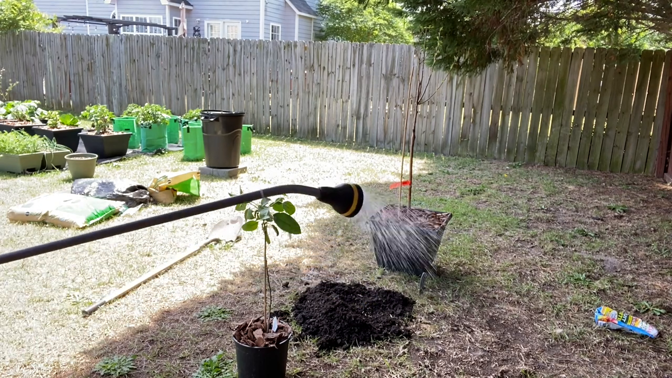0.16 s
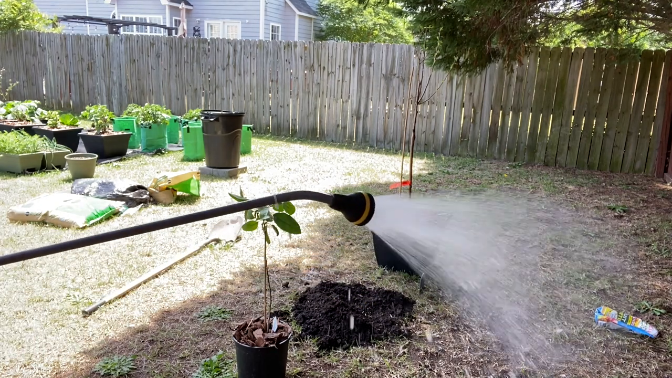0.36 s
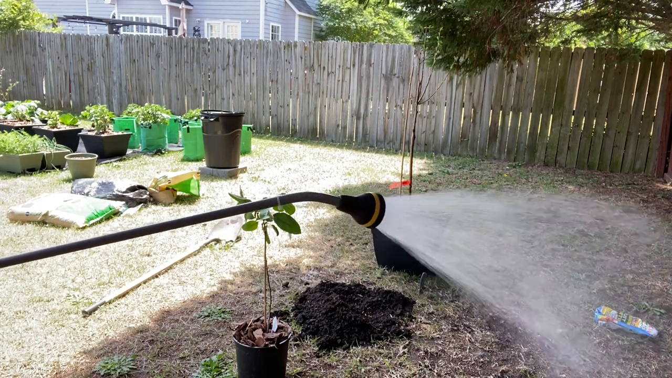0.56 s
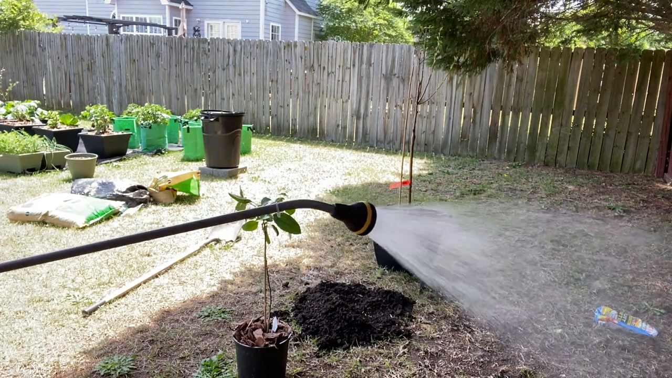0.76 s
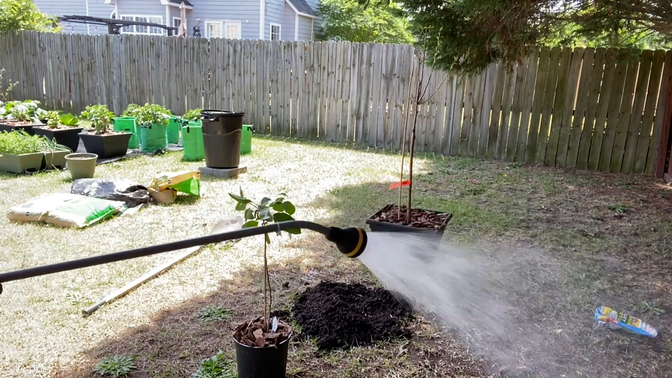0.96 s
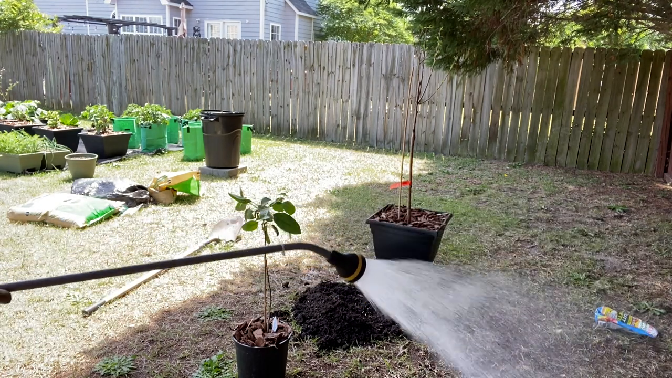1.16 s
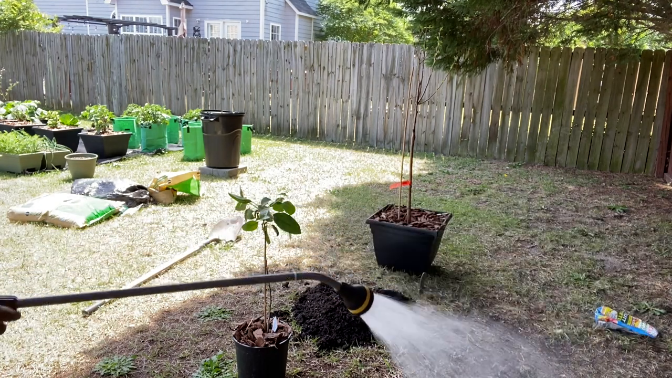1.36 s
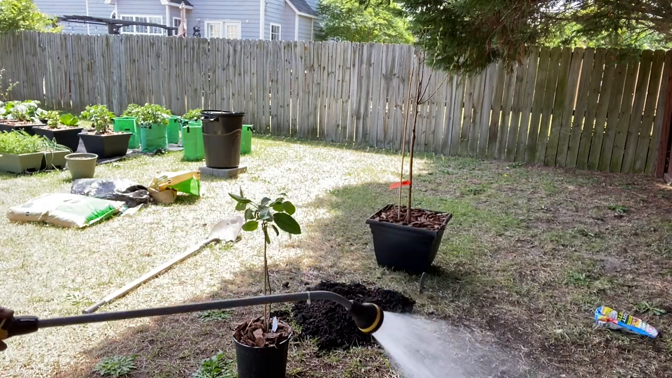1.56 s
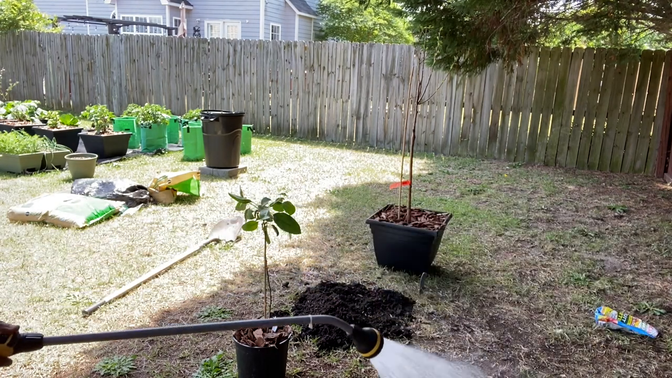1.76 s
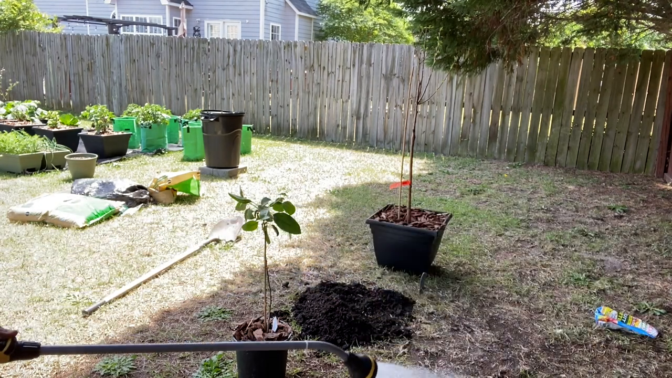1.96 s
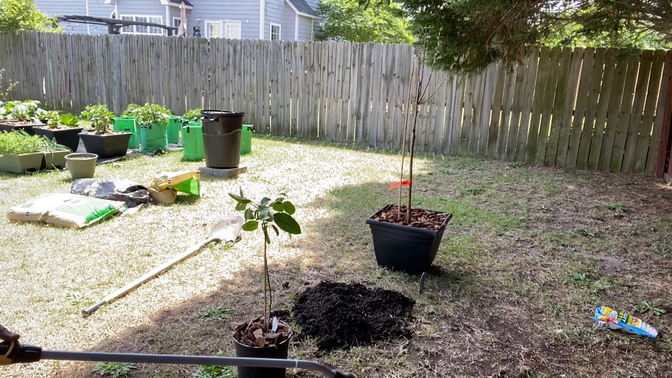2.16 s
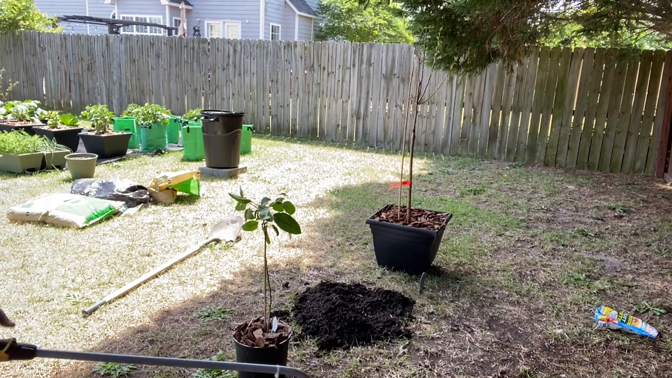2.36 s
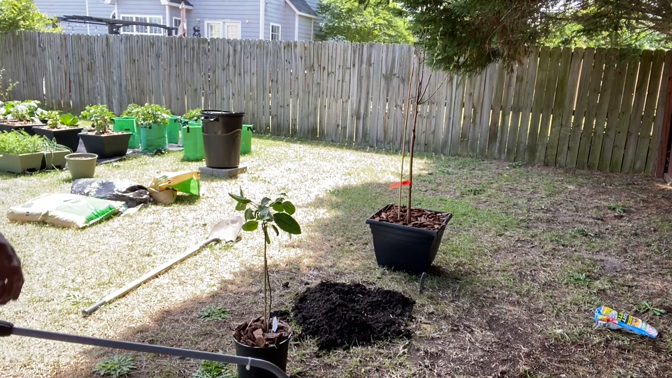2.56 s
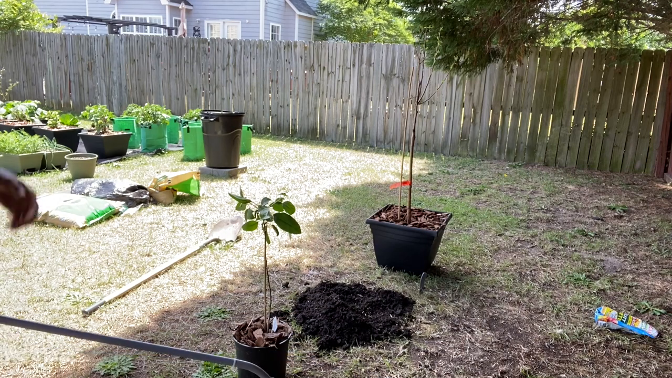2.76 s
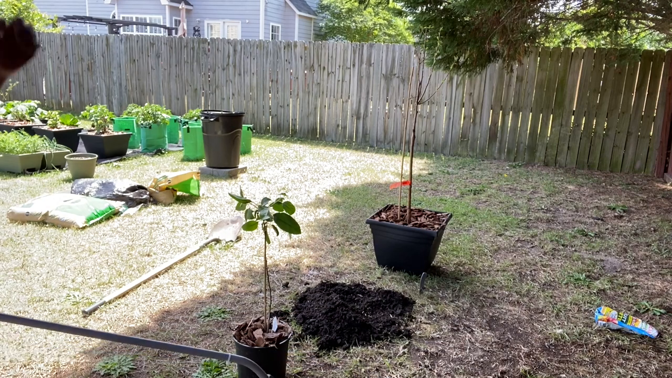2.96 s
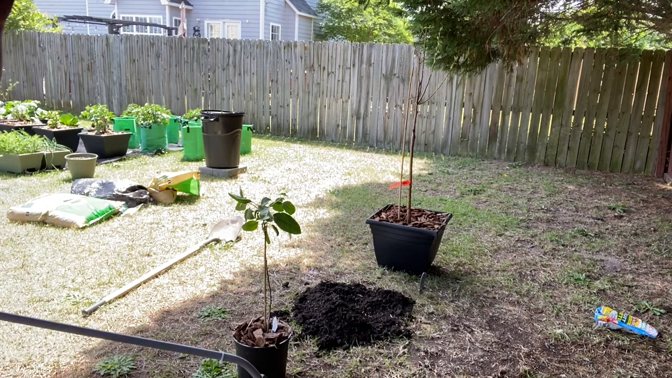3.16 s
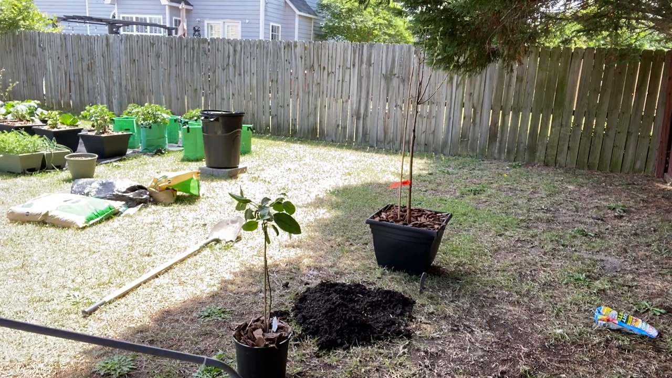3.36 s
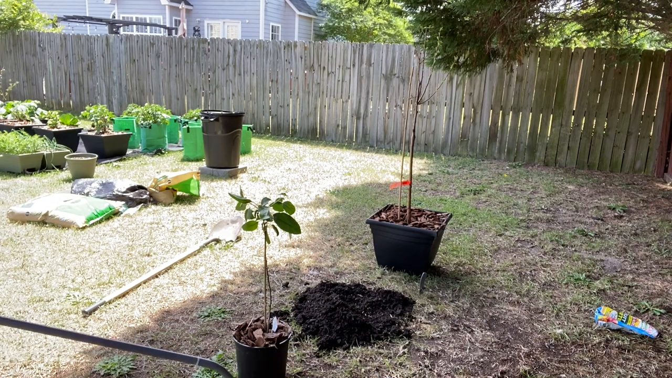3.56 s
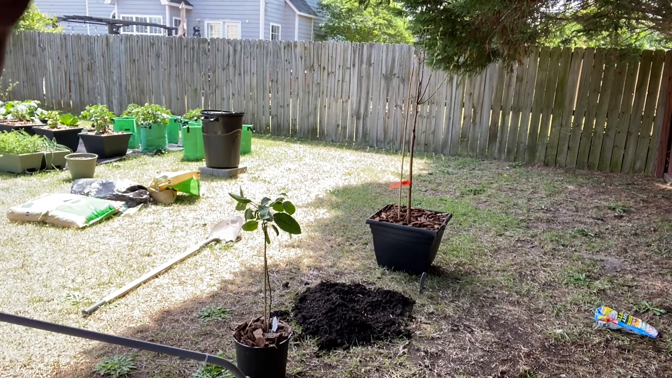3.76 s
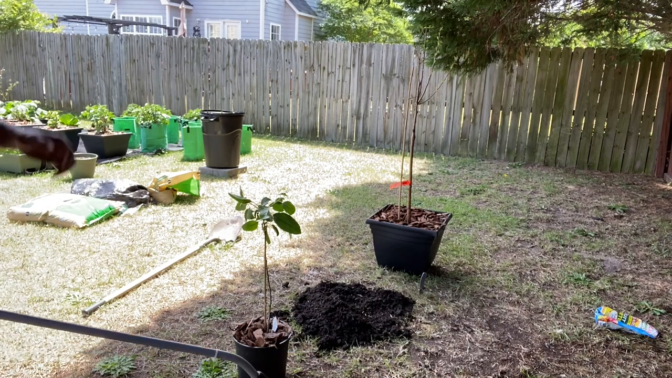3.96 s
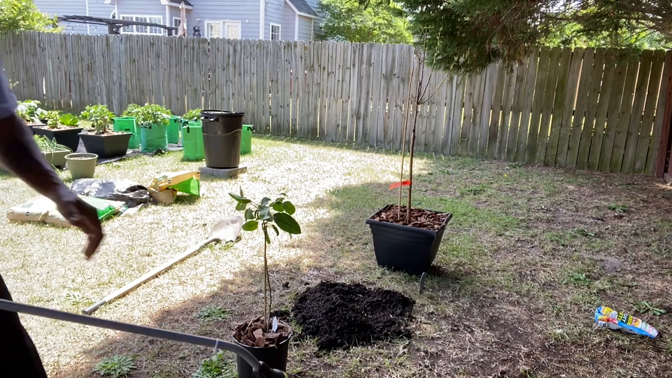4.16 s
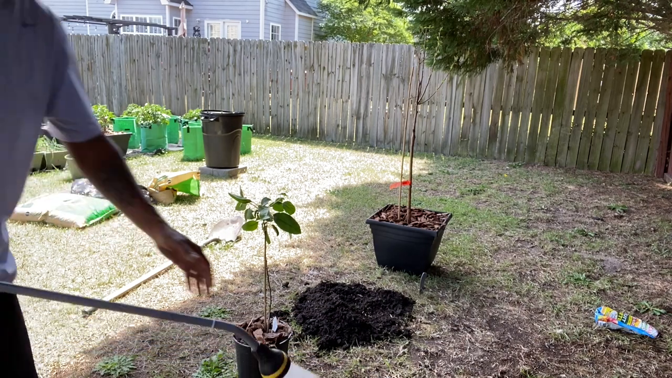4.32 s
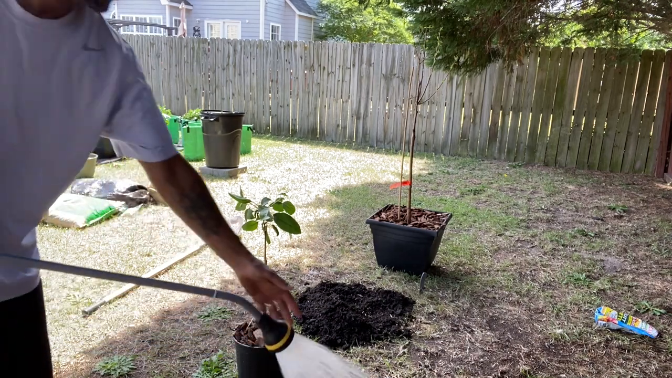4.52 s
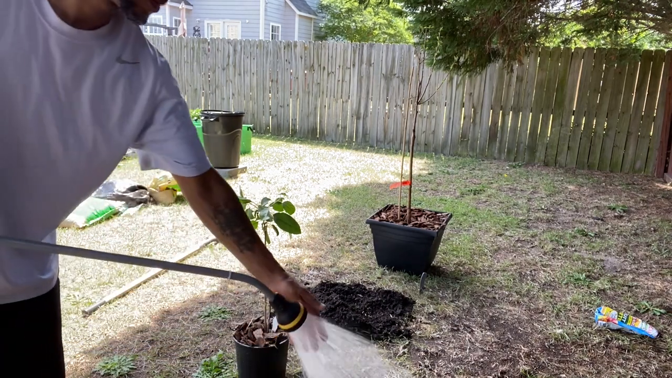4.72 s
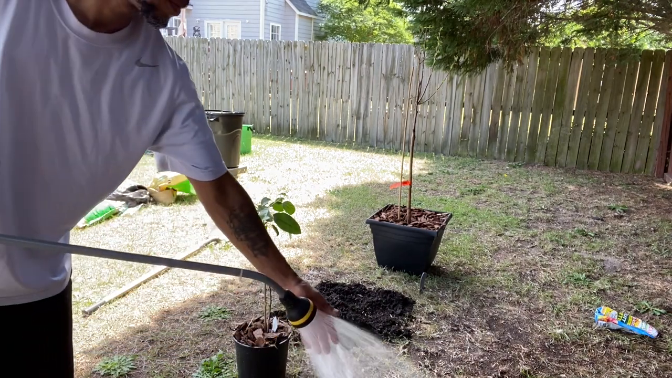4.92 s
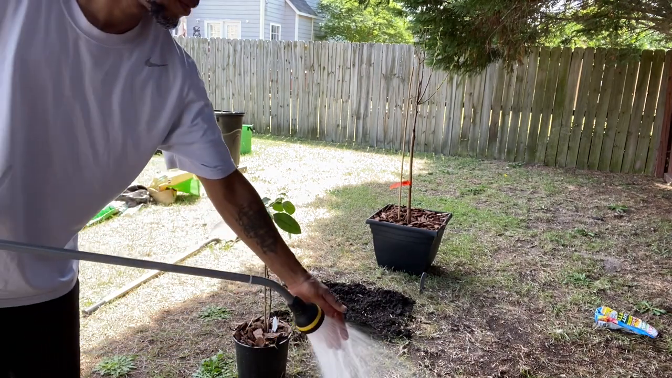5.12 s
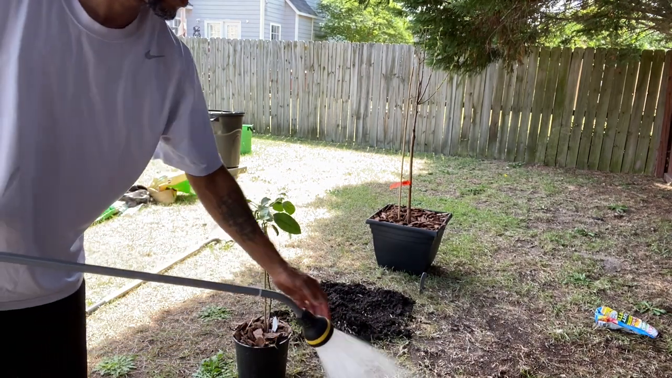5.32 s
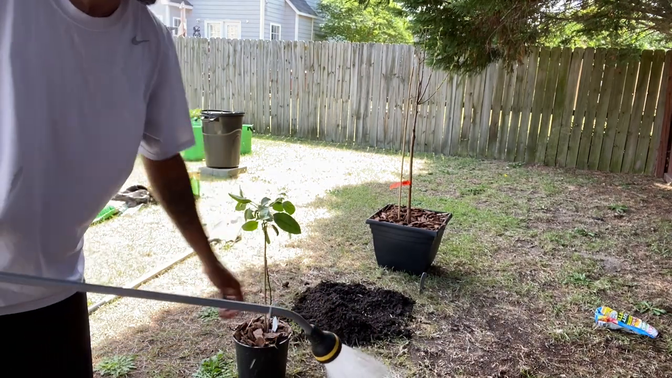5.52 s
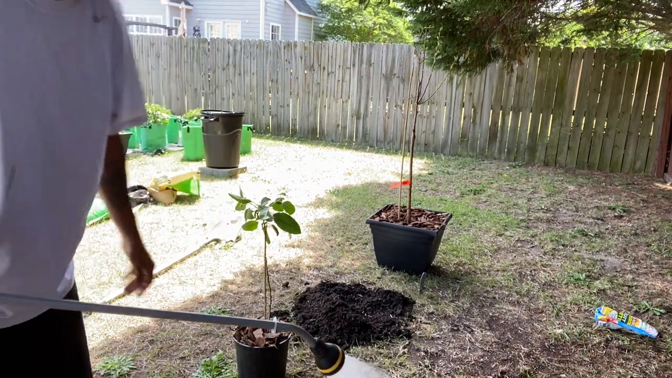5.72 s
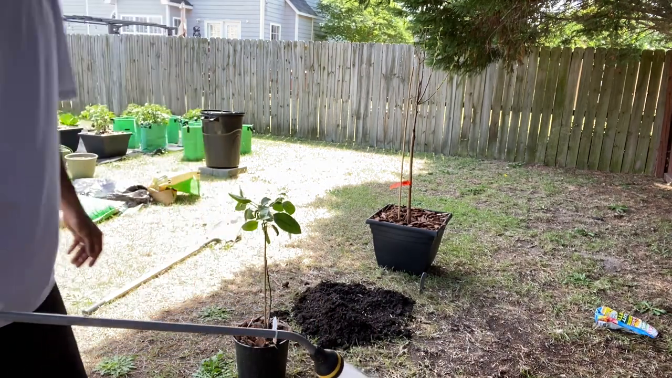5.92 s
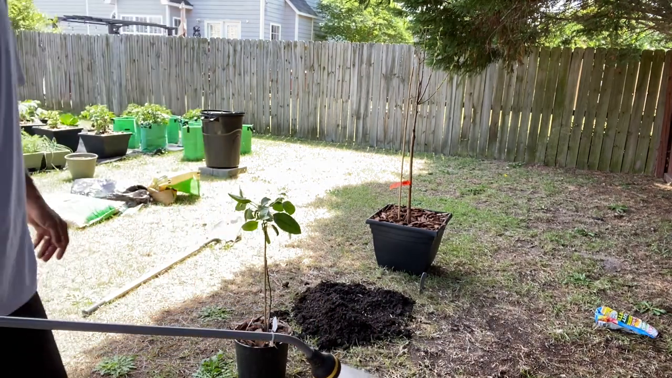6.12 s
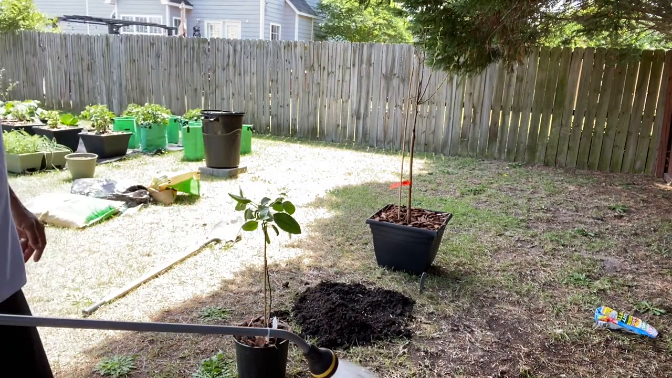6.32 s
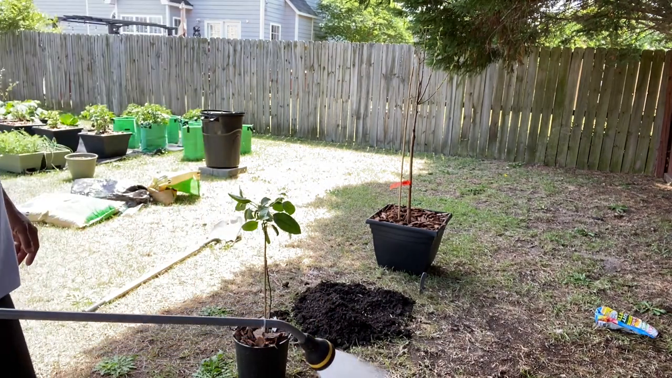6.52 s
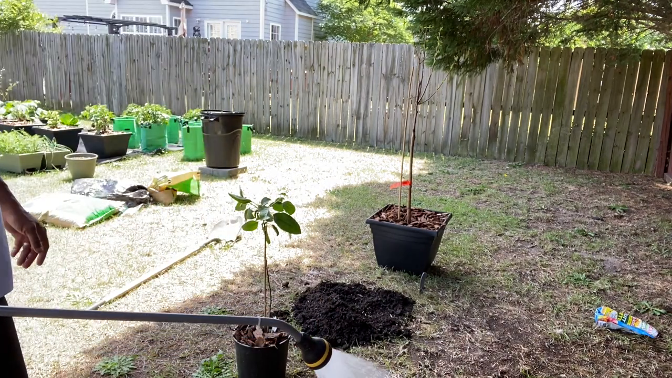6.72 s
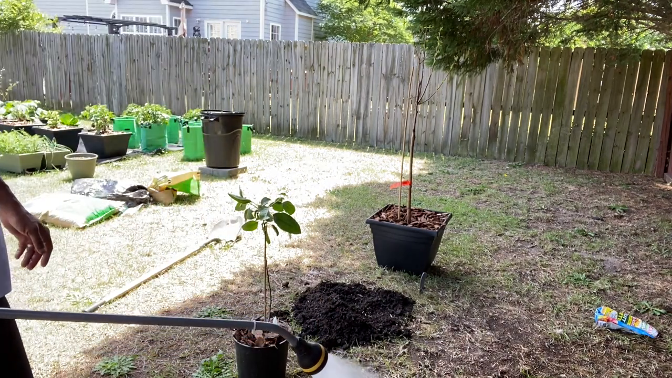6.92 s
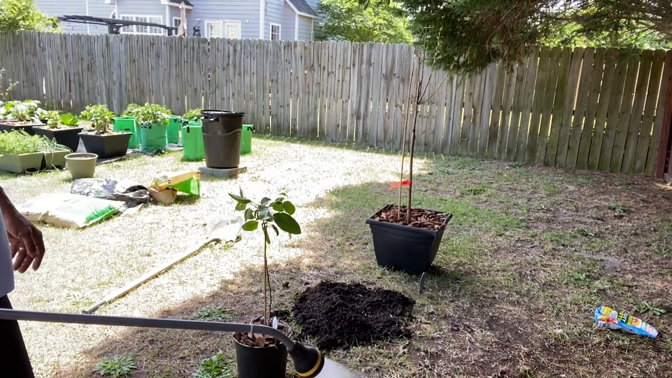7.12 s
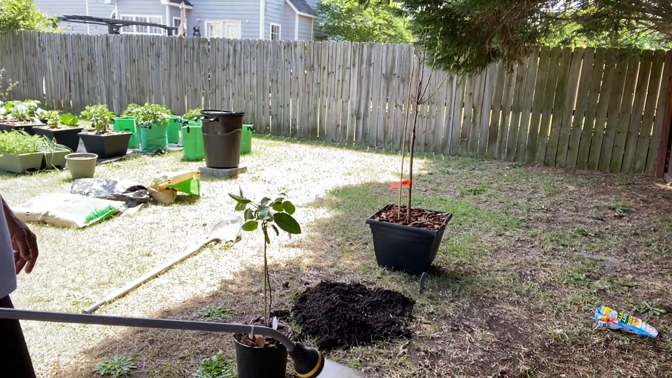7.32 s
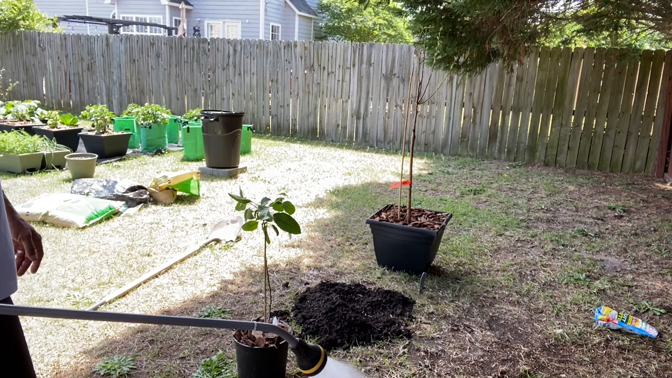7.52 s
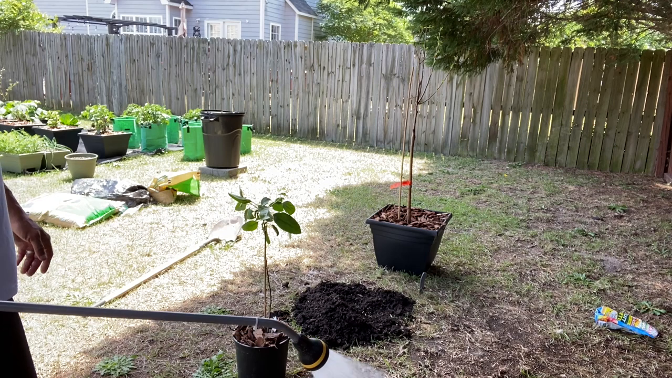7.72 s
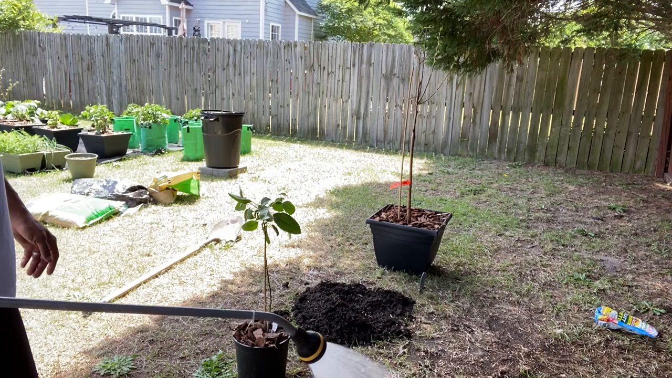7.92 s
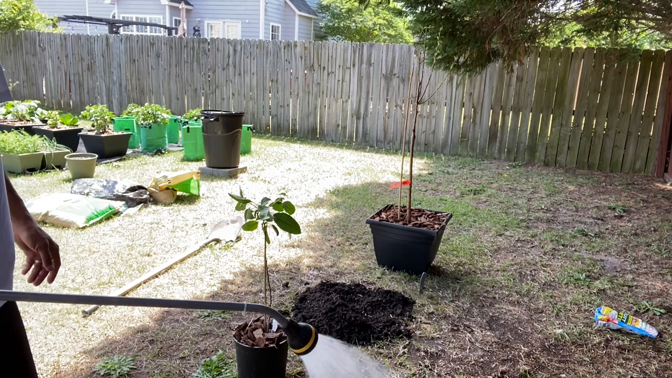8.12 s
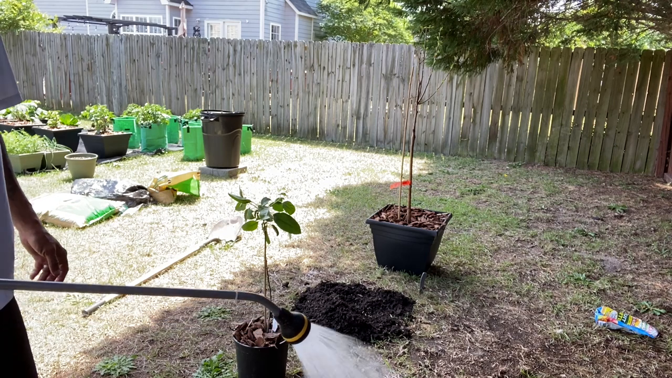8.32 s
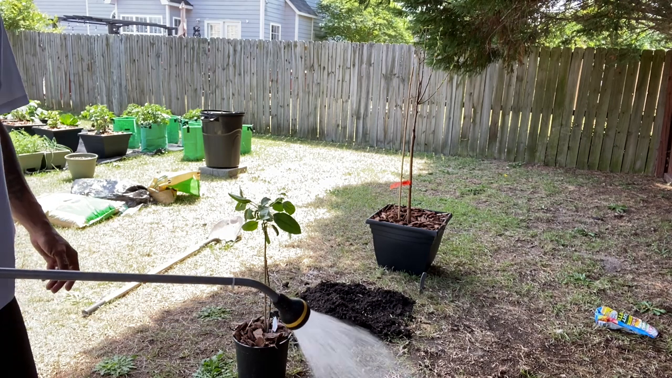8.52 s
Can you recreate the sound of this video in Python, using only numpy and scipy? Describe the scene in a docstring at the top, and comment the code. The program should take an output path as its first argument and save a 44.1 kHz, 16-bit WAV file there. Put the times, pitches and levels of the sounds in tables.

```python
"""First water dribbles from a spray wand on a garden hose; the valve snaps, water gushes, the jets settle to a hiss.
The fan of drops is lowered from the lawn onto bare soil and mulch, and a hand dips into it once.
Behind it lie the neighbourhood's low rumble, a distant machine's faint hum and a few far-off bird whistles.
Water is made of noise, random clicks and ringing drops; the hum and whistles are wavering tones;
the rumble and drones are filtered noise. Two microphone ports hear it all in stereo."""
import sys
import numpy as np
from scipy import signal
from scipy.fft import rfft, irfft, next_fast_len
from scipy.io import wavfile

SR = 44100
rng = np.random.default_rng(int(sys.argv[2]) if len(sys.argv) > 2 else 0)


def bounce(signal):
    """Save signal as a 16-bit WAV file at the path given by the first command-line argument."""
    frames = np.transpose(np.atleast_2d(signal))
    limited = np.clip(frames, -1, 1)
    pcm = np.round(limited * 32767).astype(np.int16)
    wavfile.write(sys.argv[1], SR, pcm)


N = 382788

# running spray as it is aimed about, before opening and surges: t/s, jet hiss/dB, splash/dB, soil patter/dB
RUNNING_SPRAY = [(.52, -32.5, -38.5, -51), (.8, -37.5, -36, -44.5), (1.2, -44.5, -42, -50),
                 (2.0, -42, -45.5, -52.5), (2.5, -45, -45.5, -51), (2.8, -39.5, -45, -48),
                 (3.05, -41.5, -46, -48), (3.6, -39, -45, -46.5), (4.2, -39, -44.5, -49.5),
                 (4.9, -42, -47, -51), (5.2, -40, -46, -48.5), (5.6, -41, -45.5, -48.5),
                 (6.6, -44.5, -47, -50), (7.3, -41.5, -45.5, -50), (8.68, -44.3, -46.5, -51)]
# valve opening, relative to the running spray: hiss/dB, splash/dB, patter/dB
DRIBBLE_OFFSETS = (-8, 0, 10)
GUSH_OFFSETS = (5.5, 4, 7)
# a slug of water lands or the fan crosses something close:
# middle t/s, half length/s, extra hiss/dB, extra splash/dB, extra patter/dB
SPRAY_SURGES = [(0.094, 0.014, 3.5, 2, 3.5), (0.201, 0.027, 1.5, 6, 2), (0.296, 0.013, 1, 3, 3),
                (0.33, .015, 1, 0, 5.5), (0.61, 0.05, 1.5, 0, 2.5), (1.353, 0.061, 1.5, 4, 2),
                (2.2, 0.046, 0, 3, 6.5), (5.047, 0.023, 4, 0.5, -1), (5.146, .03, 1.5, 1, -2),
                (5.323, 0.04, 3, 5, -1.5), (5.413, 0.023, 3, 6.5, 1.5), (7.057, 0.051, 1.5, 1, 1.5),
                (7.457, 0.063, 1.5, 4, -1)]

# colour of the jets' hiss: f/Hz, relative level per Hz/dB
HISS_COLOUR = [(4000, -29), (6000, 0), (6800, 0), (7500, 0.5), (8500, 3.5), (9500, 2.2), (11500, 3.5),
               (13000, 3), (14000, 3), (15700, -63)]
# colour of drops splashing on grass and mulch: f/Hz, relative level per Hz/dB
SPLASH_COLOUR = [(500, -8), (1000, -1), (1500, 1.5), (2100, 0), (2700, 2.5), (3100, -1.5), (4000, 1),
                 (5100, 1), (6300, -2), (7500, 3.5), (12000, -18), (14000, -28), (15000, -50)]
# colour of drops patting soft soil: f/Hz, relative level per Hz/dB
PATTER_COLOUR = [(150, -13), (320, 0), (420, 3), (750, 2.5), (1000, 2), (1400, -8.5), (2500, -41)]

# colour of the dull background drumming: f/Hz, relative level per Hz/dB
DRUMMING_COLOUR = [(55, -21), (80, -5.5), (100, 3.5), (130, 0.5), (180, -2), (250, -7.5), (320, -13.5),
                   (600, -40.5)]
# colour of the neighbourhood's deep rumble: f/Hz, relative level per Hz/dB
RUMBLE_COLOUR = [(20, -50), (31, -36), (40, -11), (52, 3.5), (65, 4.5), (80, -0.5), (110, -21), (250, -44)]
# low background drones that swell: middle t/s, half length/s, centre f/Hz, width/Hz, level/dB
DRONE_SWELLS = [(1.35, 0.75, 99.9, 12, -42), (1.5, 0.41, 126.2, 16, -41.5), (1.55, 0.26, 57.4, 20, -40),
                (2.55, .5, 58, 22, -44), (3.595, 0.89, 80, 31, -46.5), (6.2, 0.7, 65, 11, -43.5)]
# tones of the distant machine, before wavering: f/Hz, rms level/dB
MACHINE_TONES = [(54, -50), (177, -60), (236, -58), (295, -62.5), (590, -69)]

# slugs of water slapping the soil: t/s, peak/dB, pitch f/Hz
SOIL_SLAPS = [(.036, -31, 600), (.196, -26, 420), (.212, -24, 803), (.278, -25.5, 960), (.298, -24.5, 600),
              (.333, -26, 800), (.519, -32, 704), (.587, -35, 600), (.661, -28, 700), (.762, -27, 940),
              (.866, -31, 600)]
# short spits of air and water: middle t/s, level/dB, half length/s, centre f/Hz
WATER_SPITS = [(0.09, -37, 0.032, 1590), (0.152, -30, 0.009, 4800), (0.161, -27.5, 0.009, 6200),
               (0.185, -30, 0.006, 4200), (0.211, -38, 0.021, 260), (0.201, -33, 0.005, 900),
               (5.1128, -29, 0.003, 7500), (5.113, -35.5, 0.0018, 2020)]
# sharp snaps of the valve, then of fat drops close by: t/s, peak/dB, pitch f/Hz
SHARP_SNAPS = [(.1571, -8, 8000), (.1618, -8, 8000), (.199, -14, 8000), (5.0497, -28, 8000),
               (5.1128, -24, 8000), (5.1347, -17.5, 9000), (5.1655, -24.5, 8000), (5.313, -25, 8500),
               (5.375, -24, 8500), (5.389, -27, 10000), (5.46, -27, 8500), (6.572, -29, 9000),
               (6.6126, -31, 9000), (7.018, -30, 9000), (7.068, -28, 9000), (7.343, -26, 9500),
               (7.4005, -26, 8500), (7.85, -28, 9000), (8.116, -29, 9000), (8.2015, -28, 9000),
               (8.2345, -28, 9000), (8.534, -31, 9000)]
# hollow resonances as the nozzle moves over the ground: loudest t/s, rise/s, fall/s, centre f/Hz,
# glide/(octaves per s), width/Hz, level before flicker/dB, phase by which left leads/rad
GROUND_HOLLOWS = [(0.279, 0.079, 0.16, 1545, 0.048, 280, -45, 0),
                  (.3, 0.18, 0.27, 3250, -.05, 900, -43.5, 0), (.75, 0.29, 0.22, 3340, -.05, 450, -47, 3),
                  (0.79, 0.17, 0.16, 1650, 0, 700, -47.5, -2.5),
                  (0.73, 0.2, 0.27, 2250, .1, 220, -51, -2.5),
                  (1.15, 0.19, 0.38, 1715, .14, 90, -46.5, -2.5),
                  (.8, .45, 0.74, 5750, .03, 1300, -48.5, -1),
                  (0.92, 0.31, 0.33, 3120, 0.14, 250, -54.5, 2.5),
                  (1.5, 0.42, 0.84, 3306, .26, 640, -48.5, 0),
                  (1.48, 0.075, 0.21, 6700, .1, 1200, -42, -0.5),
                  (2.03, 0.67, 0.79, 7200, .08, 2100, -40.5, 0),
                  (2.0, 0.62, 0.33, 1835, .09, 74, -50.5, -1.5),
                  (1.98, 0.33, 0.25, 2340, 0.15, 230, -52.5, -2.5), (2.2, .3, 0.58, 4450, .1, 400, -53, 1),
                  (3.4, 2.2, 1.3, 4000, .085, 590, -49.5, 0.6), (3.65, 0.72, 0.55, 4650, 0.07, 340, -54, 2),
                  (4.9, 2.8, 1.25, 5650, .02, 1600, -50.5, 1), (4.0, 4.3, 1.9, 6950, -.01, 710, -52, 0.5),
                  (3.95, 0.092, 0.092, 6600, 0, 400, -51, 0), (4.58, .2, .13, 7800, 0, 450, -50, 0.5),
                  (5.55, 0.29, .35, 6920, 0.075, 340, -50.5, -0.5), (5.1, 1.1, .8, 2520, 0, 350, -56.5, 0),
                  (3.67, 0.81, 1.1, 390, 0, 99, -53, 0), (5.2, 2.4, 3.4, 3300, 0.034, 1000, -61, -0.5),
                  (6.9, 1.45, 1.6, 2270, -.01, 820, -54, 0.5)]

# drops on the lawn while the fan still reaches it: t/s, level/dB
LAWN_LEVELS = [(.48, -69), (.6, -47), (.8, -45), (1.1, -56), (1.5, -57), (2.2, -58), (2.5, -75),
               (2.8, -100)]
# colour of those drops: f/Hz, relative level per Hz/dB
LAWN_COLOUR = [(450, -14), (850, 15), (1300, -6), (2300, -1), (2800, -14), (3500, -37)]
# a distant bird's whistles: middle t/s, half length/s, pitch there f/Hz, rise/(Hz per s), level before flutter/dB
BIRD_WHISTLES = [(6.11, .022, 2500, 2500, -54), (6.335, .018, 2345, 2000, -53.5),
                 (6.518, .024, 2345, 1500, -51), (6.665, .018, 2110, 9000, -53.5),
                 (6.703, .02, 2335, 4000, -50.5), (6.865, .024, 2110, 2000, -51),
                 (6.907, .022, 2265, 6500, -52.5), (6.975, .02, 2250, 4000, -55),
                 (7.012, .014, 2500, 9000, -54.5), (7.075, .018, 2590, 7000, -52.5)]

# how alike the two microphone ports hear a sound: f/Hz, likeness/(0 to 1)
PORT_LIKENESS = [(60, .97), (130, .88), (280, .62), (600, .45), (1100, .4), (2200, .5), (3200, .7),
                 (4500, .6), (5800, .3), (6500, .7), (7000, .98), (9500, .99), (10000, .88), (15000, .9)]
# phase between the ports: f/Hz, phase by which left leads/rad
PORT_LEAD = [(100, 0), (260, -.2), (500, -1.1), (1000, -2.2), (1600, -1.2), (2500, -1.3), (3100, -2.7),
             (4000, -1.7), (5200, -2.5), (6200, -.1), (9500, 0), (10500, .8), (12000, 1.6), (14500, 3),
             (15700, 3.3)]
# loudness between the ports: f/Hz, level by which left is louder/dB
PORT_LEVEL = [(110, 1.8), (200, 1.5), (380, -0.5), (600, -3), (1300, -2), (2400, 0), (4400, -1.8),
              (8000, -0.5)]
# the microphone's own treble colour: f/Hz, level/dB
MIC_TREBLE = [(5500, -0.5), (6550, -2.5), (6850, 1), (7600, 0.5)]

TIME = np.arange(N) / SR  # seconds
FFT_SIZE = next_fast_len(N, real=True)
BIN_HZ = np.maximum(np.fft.rfftfreq(FFT_SIZE, 1 / SR), 1)
SIDES = np.array([[1], [-1]]) / 2  # left and right each take half of a difference


def from_db(db):
    """Turn decibels into a gain."""
    return 10 ** (np.asarray(db) / 20)


def rms_one(x):
    """Scale to an rms (average strength) of 1."""
    return x / np.sqrt(np.mean(x ** 2) + 1e-20)


def in_time(rows):
    """Draw each column of a table as a curve over time."""
    s, *columns = np.transpose(rows)
    return [np.interp(TIME, s, column) for column in columns]


def at_hz(points, hz):
    """Read a table between its frequencies, on a logarithmic axis."""
    f, value = np.transpose(points)
    return np.interp(np.log(hz), np.log(np.sort(f)), value)


def filtered(x, response):
    """Apply a frequency response given at BIN_HZ."""
    return irfft(rfft(x, FFT_SIZE) * response, FFT_SIZE)[..., :N]


def bell(s, half):
    """A smooth swell of height 1 around a moment."""
    return np.exp(-np.minimum(((TIME - s) / half) ** 2, 20))


def drift(rate_hz):
    """Slow random wandering with rms 1: twice-smoothed noise, drawn at every 50th sample."""
    r = np.exp(-100 * np.pi * rate_hz / SR)
    noise = rng.standard_normal(N // 50 + 2002)
    slow = signal.lfilter([1], [1, -2 * r, r * r], noise)[2000:]  # skip the run-in
    return np.interp(np.arange(N) / 50, np.arange(len(slow)), rms_one(slow))


def resonate(x, hz, width_hz):
    """A resonance that favours one pitch, with gain 1 at its peak."""
    r = np.exp(-np.pi * width_hz / SR)
    forward = np.array([1, 0, -1]) * (1 - r * r) / 2
    feedback = [1, -2 * r * np.cos(2 * np.pi * hz / SR), r * r]
    return signal.lfilter(forward, feedback, x + 1e-18)


def at_ports(three, spectrum):
    """Colour one sound shared by both ports and one of each port's own, and mix them to rms 1."""
    alike = np.clip(at_hz(PORT_LIKENESS, BIN_HZ), 0, 1)
    colour = from_db(at_hz(spectrum, BIN_HZ))
    shared = filtered(three[0], colour * np.sqrt(alike))
    own = filtered(three[1:], colour * np.sqrt(1 - alike))
    return rms_one(shared + own)


def rush(spectrum):
    """Smooth stereo noise of a given colour."""
    return at_ports(rng.standard_normal((3, N)), spectrum)


def impacts(per_s, spread_db, count=3):
    """Trains of clicks at random moments, many small and few large."""
    out = np.zeros((count, N))
    for train in out:
        at = rng.integers(0, N, int(per_s * N / SR))
        size = np.minimum(rng.exponential(1, len(at)), 5.2)
        train[at] = from_db(spread_db * size) * rng.choice([-1, 1], len(at))
    return out


def droplets(spectrum, low_hz, high_hz, per_s, spread_db, sharpness, clump_db, count=10):
    """Each drop rings a few cycles at a pitch set by its size; drops of one size arrive in clumps."""
    out = 0
    for hz in np.geomspace(low_hz, high_hz, count):
        rings = resonate(impacts(per_s / count, spread_db), hz, hz / sharpness)
        out = out + rings * from_db(clump_db * drift(28))
    return at_ports(out, spectrum)


def hits(rows, decay_s, relative_width):
    """Each hit is a noise burst that starts at once and dies away, coloured around its pitch."""
    out = np.zeros(N)
    age = TIME[:2048]
    for s, peak_db, hz in rows:
        noise = rng.standard_normal(len(age)) * np.exp(-age / decay_s)
        burst = resonate(noise, hz, hz * relative_width)
        at = int(s * SR)
        out[at:at + len(age)] += from_db(peak_db) * burst / np.abs(burst).max()
    return out


def spray_gains():
    """Water flow sets hiss, splash and patter: a dribble builds, a gush rises, holds and relaxes; surges add."""
    dribble_rise_s, dribble_rise_db = 0.079, 11.5
    open_s, attack_s, hold_s, release_s = 0.16, 0.036, 0.16, 0.13
    opening_s = [0, dribble_rise_s, *np.cumsum([open_s, attack_s, hold_s, release_s])]
    opening_db = []
    for dribble, gush in zip(DRIBBLE_OFFSETS, GUSH_OFFSETS):
        levels_db = [dribble - dribble_rise_db, dribble, dribble, gush, gush, 0]
        opening_db.append(np.interp(TIME, opening_s, levels_db))
    surge_db = sum(np.outer(extra_db, bell(s, half)) for s, half, *extra_db in SPRAY_SURGES)
    return from_db(np.array(in_time(RUNNING_SPRAY)) + opening_db + surge_db)


def jets(gain, mist_db=-2.5, ticks_db=-7.5, beads_db=-6, flutter_db=1.0):
    """Jets tear into mist, ticks and tiny ringing beads; the fan flutters, and evens out at full force."""
    ticks = at_ports(impacts(per_s=1900, spread_db=2.5), HISS_COLOUR)
    beads = droplets(HISS_COLOUR, low_hz=7100, high_hz=13700, per_s=3600, spread_db=3.5,
                     sharpness=9.2, clump_db=4.0, count=8)
    fan = from_db(mist_db) * rush(HISS_COLOUR) + from_db(ticks_db) * ticks + from_db(beads_db) * beads
    fluttering_fan = fan * from_db(flutter_db * drift(39))
    # the stronger the jets, the more their drops merge into smooth mist
    merge_above_db, merge_slope = -41, 0.7  # slope: dB of grain lost per dB
    grain = np.minimum(from_db(merge_above_db) / gain, 1) ** merge_slope
    smooth_mist = np.sqrt(1 - grain ** 2) * rush(HISS_COLOUR)
    return gain * (grain * fluttering_fan + smooth_mist)


def splash(wash_db=-5.5, drops_db=-1.5):
    """Drops burst and ring on blades and bark over a smooth wash."""
    drops = droplets(SPLASH_COLOUR, low_hz=1100, high_hz=6500, per_s=4500, spread_db=3.1,
                     sharpness=9, clump_db=2.0, count=14)
    flutter = from_db(0.35 * drift(14))
    return (from_db(wash_db) * rush(SPLASH_COLOUR) + from_db(drops_db) * drops) * flutter


def patter():
    """Soft soil answers each drop with a dull pat."""
    return at_ports(impacts(per_s=2500, spread_db=2.5), PATTER_COLOUR)


def rumble(start_db=-43.5, ebb_db_per_s=0.5):
    """Deep noise from the neighbourhood slowly ebbs, and its level dips briefly."""
    dip_db = 8 * bell(4.5, 0.17)
    return from_db(start_db - ebb_db_per_s * TIME - dip_db) * rush(RUMBLE_COLOUR)


def drumming(start_db=-42.5, ebb_db_per_s=0.35):
    """Dull low noise slowly ebbs."""
    return from_db(start_db - ebb_db_per_s * TIME) * rush(DRUMMING_COLOUR)


def drones():
    """Noise in low bands, some broad and some almost a tone, rises and sinks again."""
    out = 0
    for s, half, hz, width_hz, level_db in DRONE_SWELLS:
        once = resonate(rng.standard_normal(N), hz, width_hz)
        band = resonate(once, hz, width_hz)
        out = out + from_db(level_db) * bell(s, half) * rms_one(band)
    return out


def machine(wander_share=0.0013, waver_db=2.5):
    """Steady far-off tones waver in pitch and level on their way through the air."""
    turns = 2 * np.pi * np.cumsum(1 + wander_share * drift(6.6)) / SR
    out = 0
    for hz, level_db in MACHINE_TONES:
        gain = from_db(level_db + waver_db * drift(2.1))
        out = out + np.sqrt(2) * gain * np.sin(hz * turns)
    return out


def yard():
    """The background is rumble, drumming, drones and the distant machine, added together."""
    return rumble() + drumming() + drones() + machine()


def whistle(pitch_hz=2825, wander_hz=2.24, level_db=-60.3, waver_db=1.8, build_s=1.0, left_lead_rad=0.85):
    """Water forced through a narrow gap sings a faint, wavering tone that builds up, from its own direction."""
    build = 1 - np.exp(-TIME / build_s)
    turn = 2 * np.pi * np.cumsum(pitch_hz + wander_hz * drift(7.5)) / SR
    gain = build * from_db(level_db + waver_db * drift(19.0))
    return np.sqrt(2) * gain * np.sin(turn + SIDES * left_lead_rad)


def slaps():
    """Slugs of water smack the soil with short, dull bursts."""
    return hits(SOIL_SLAPS, decay_s=0.0051, relative_width=0.94)


def spits(relative_width=0.92):
    """Pockets of air and water burst out as brief crackling puffs."""
    crackle = impacts(per_s=20000, spread_db=2.0, count=1)[0]
    out = 0
    for s, level_db, half, hz in WATER_SPITS:
        once = resonate(crackle, hz, hz * relative_width)
        puff = resonate(once, hz, hz * relative_width)
        out = out + from_db(level_db) * bell(s, half) * rms_one(puff)
    return out


def hollow(hz, width_hz, apart, lead, per_s=2000, spread_db=2.0):
    """Drops excite a resonance whose centre glides; the ports hear it partly apart."""
    drops = impacts(per_s, spread_db, count=4).reshape(2, 2, N)
    # slow random signals, then moved up to the gliding pitch
    mid, side = filtered(drops, 1 / (1 + (2 * BIN_HZ / width_hz) ** 2))
    cosine, sine = np.swapaxes(np.array([mid + apart * side, mid - apart * side]), 0, 1)
    turn = 2 * np.pi * np.cumsum(hz) / SR + SIDES * lead
    return rms_one(cosine * np.cos(turn) + sine * np.sin(turn))


def hollows(flicker_db=1.1, wander_octaves=0.012):
    """Each resonance swells, flickers and fades while its centre glides a little unsteadily."""
    out = 0
    for s, rise, fall, hz, glide, width_hz, level_db, lead in GROUND_HOLLOWS:
        alike = np.clip(at_hz(PORT_LIKENESS, hz), 0, 1)
        apart = np.sqrt((1 - alike) / (1 + alike))
        octaves = glide * (TIME - s) + wander_octaves * drift(6)
        ringing = hollow(hz * 2 ** octaves, width_hz, apart, lead)
        swell = bell(s, np.where(TIME < s, rise, fall))
        out = out + from_db(level_db + flicker_db * drift(9)) * swell * ringing
    return out


def splatter(peak_s=0.22, rise_s=0.03, fall_s=0.22, level_db=-40):
    """The gush's first water lands in fat, uneven clumps of ringing drops."""
    drops = droplets(SPLASH_COLOUR, low_hz=1500, high_hz=6000, per_s=700, spread_db=3.0,
                     sharpness=7, clump_db=4.0, count=6)
    swell = bell(peak_s, np.where(TIME < peak_s, rise_s, fall_s))
    return from_db(level_db) * swell * drops


def snaps():
    """The valve and fat drops make hard clicks that die away in about a millisecond."""
    return hits(SHARP_SNAPS, decay_s=0.0003, relative_width=0.8)


def lawn(left_delay_s=0.00018):
    """Drops rustle in the grass far to the right, so they reach the right port first."""
    level_db, = in_time(LAWN_LEVELS)
    rustle = at_ports(impacts(per_s=3500, spread_db=2.0), LAWN_COLOUR)
    delays_s = np.array([[left_delay_s], [0]])
    return from_db(level_db) * filtered(rustle, np.exp(-2j * np.pi * BIN_HZ * delays_s))


def bird(wobble_hz=10, flutter_db=0.8):
    """Thin upward whistles are pure gliding tones, made unsteady by the distance."""
    wobble = wobble_hz * drift(80)
    out = 0
    for s, half, hz, rise_hz_per_s, level_db in BIRD_WHISTLES:
        pitch_hz = hz + wobble + rise_hz_per_s * (TIME - s)
        turn = 2 * np.pi * np.cumsum(pitch_hz) / SR
        out = out + np.sqrt(2) * from_db(level_db) * bell(s, half) * np.sin(turn)
    return out * from_db(flutter_db * drift(40))


def scene():
    """Add up the spray, its resonances, the yard and the bird as they reach the two ports."""
    hiss_gain, splash_gain, patter_gain = spray_gains()
    water = jets(hiss_gain) + splash_gain * splash() + patter_gain * patter()
    water = water + splatter() + lawn() + slaps() + spits() + snaps()
    return water + hollows() + whistle() + yard() + bird()


def record(dry):
    """The ports differ in phase and level, the microphone colours the treble, and the top is cut steeply."""
    phase = np.exp(1j * SIDES * at_hz(PORT_LEAD, BIN_HZ))
    balance = from_db(SIDES * at_hz(PORT_LEVEL, BIN_HZ))
    treble = from_db(at_hz(MIC_TREBLE, BIN_HZ))
    cutoff_hz = 15700
    top_cut = 1 / np.sqrt(1 + (BIN_HZ / cutoff_hz) ** 240)
    return filtered(dry, phase * balance * treble * top_cut)


dry = scene()
out = record(dry)
bounce(out)
```